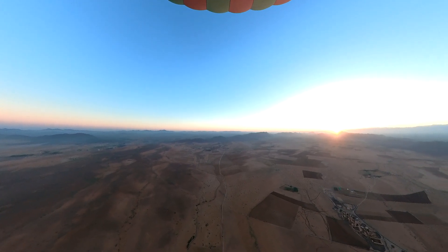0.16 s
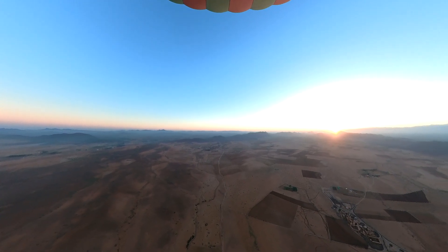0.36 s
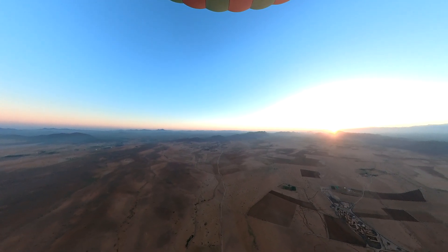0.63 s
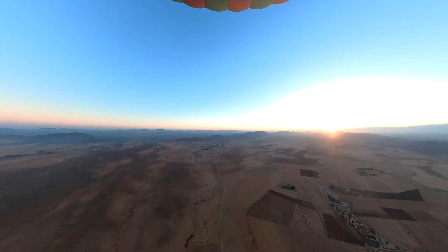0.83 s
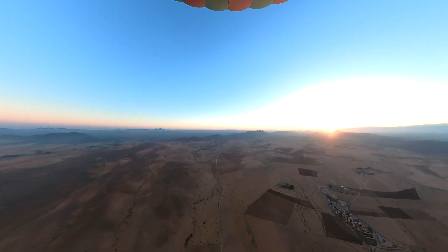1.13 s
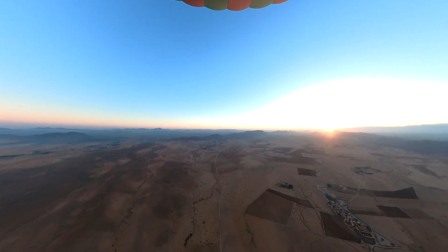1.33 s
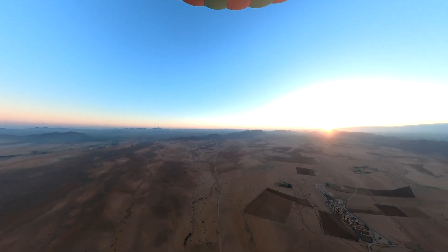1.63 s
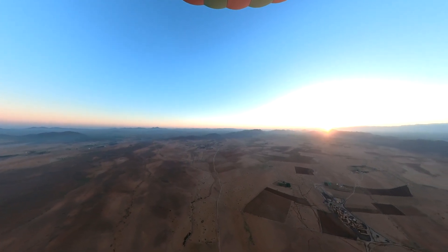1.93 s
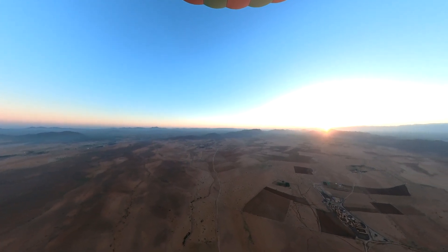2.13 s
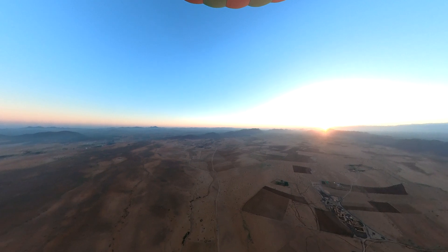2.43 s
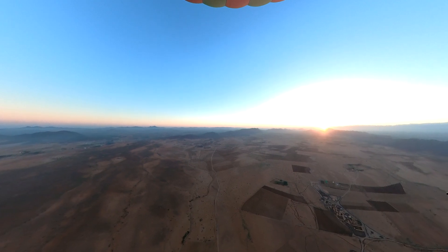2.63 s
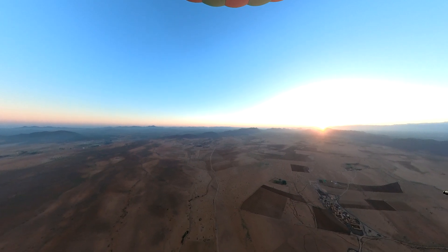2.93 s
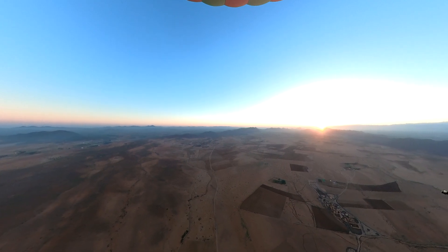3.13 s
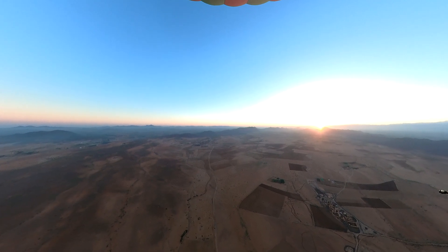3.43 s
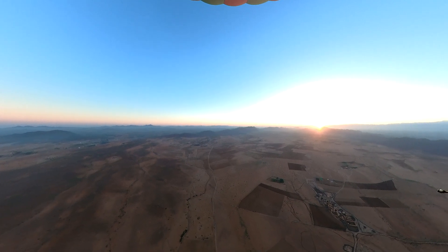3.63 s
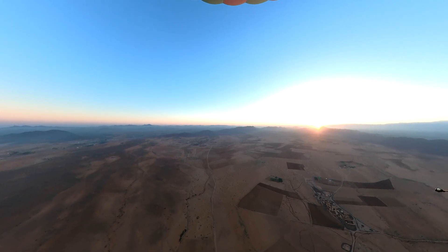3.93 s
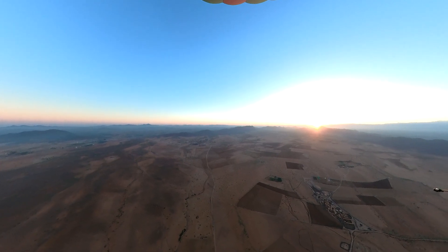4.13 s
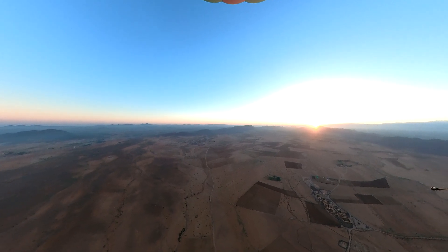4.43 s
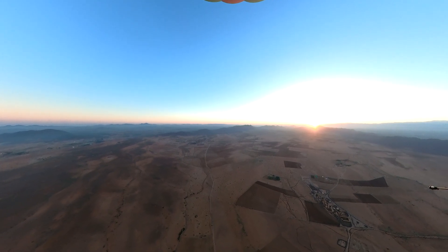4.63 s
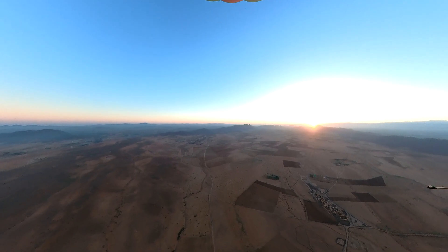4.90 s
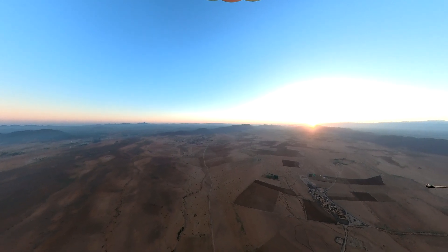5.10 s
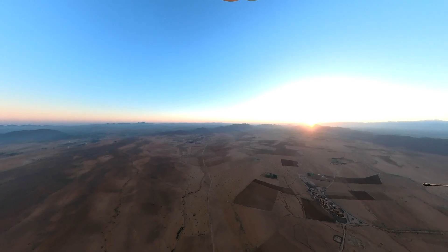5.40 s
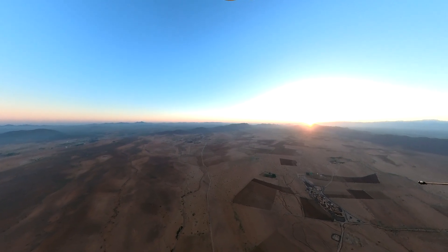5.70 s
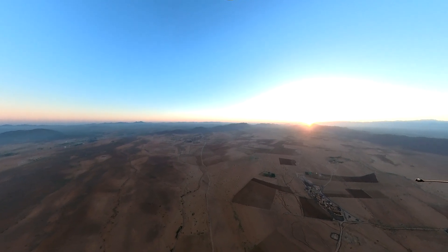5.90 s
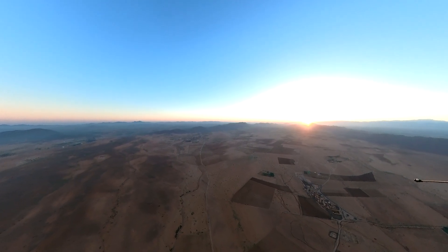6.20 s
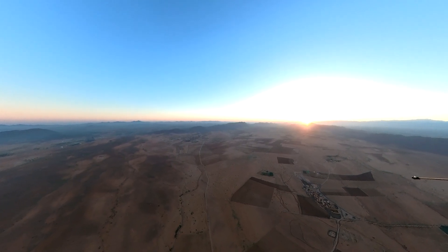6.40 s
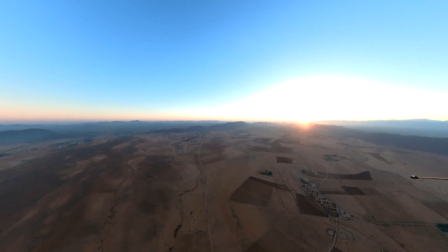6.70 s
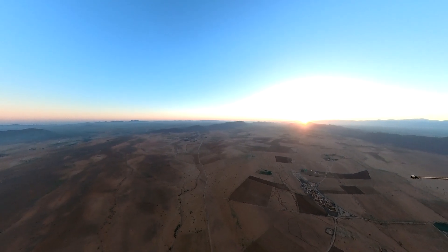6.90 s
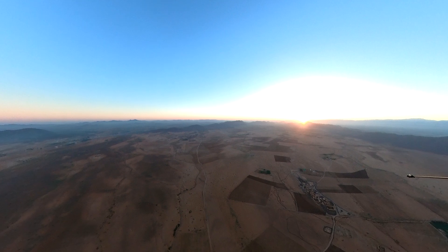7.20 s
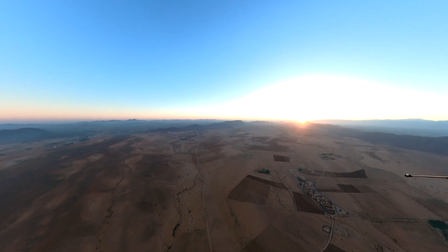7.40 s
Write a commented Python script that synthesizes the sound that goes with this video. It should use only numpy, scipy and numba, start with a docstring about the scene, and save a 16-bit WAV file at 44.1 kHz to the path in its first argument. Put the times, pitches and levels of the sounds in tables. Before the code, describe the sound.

A steady gas burner roars overhead, dominated by low rumbling flame, with fainter jet hiss and small irregular swells. A short, thin echo from the fabric envelope blends into it. Near seven seconds the blast dies within a tenth of a second, darkening into a soft thump and brief gas sputter. Only a low flame mutter and weak, breathy wavering whistle remain. Close outdoor pickup through a small microphone with automatic gain control.

```python
"""A burner blasts steadily above a balloon basket for 7 s, then its valve shuts with a soft thud and a puff.
The flame roars low and the gas jets hiss high: noise in fluttering bands, cut by the valve opening.
The fabric envelope overhead returns a short echo, a decaying noise tail.
Afterwards only the pilot flame mutters and whistles: shaped noise and an unsteady edge tone.
A small microphone with gain control holds the peaks down."""
import sys
import numpy as np
from scipy import signal
from scipy.fft import rfft, irfft
from scipy.io import wavfile
from scipy.ndimage import uniform_filter1d
from numba import njit

SR = 44100
rng = np.random.default_rng(int(sys.argv[2]) if len(sys.argv) > 2 else 0)


def transcribe(u):
    """Save the signal u as a 16-bit wav file named by the first command-line argument.

    u: samples, shape (n,) or (channels, n), limited to [-1, 1]; the rate is SR.
    q: integer samples, one column per channel.
    """
    v = np.clip(np.atleast_2d(u).T, -1, 1)
    q = np.round(v * 32767).astype(np.int16)
    wavfile.write(sys.argv[1], SR, q)


N = 332955
TIME_S = np.arange(N) / SR
HZ = np.maximum(np.arange(N // 2 + 1) * SR / N, 1)
VALVE_STARTS_S, VALVE_SHUT_S = 6.93, 7.04


def undb(db):
    """dB to gain."""
    return 10 ** (np.asarray(db) / 20)


def level(x, db):
    """Scale to an rms level over the whole signal."""
    return x * undb(db) / np.sqrt(np.mean(x ** 2))


def curve(table):
    """Table value at every moment, straight between points."""
    return np.interp(TIME_S, *np.transpose(table))


def shape(table):
    """dB at every frequency, straight between points on a log axis."""
    hz, db = np.transpose(table)
    return np.interp(np.log(HZ), np.log(hz), db, left=-120, right=-120)


def noise(gain):
    """Noise with a gain for each frequency."""
    return irfft(rfft(rng.standard_normal(N)) * gain, N)


def walk(rate_hz):
    """Random levels held 1 / rate_hz seconds and smoothed twice; zero mean, unit spread."""
    hold = int(SR / rate_hz)
    steps = np.repeat(rng.standard_normal(N // hold + 1), hold)[:N]
    smooth = uniform_filter1d(uniform_filter1d(steps, hold), hold)
    return (smooth - smooth.mean()) / smooth.std()


def turbulent(db, shared_db, own_db, rate_hz, lean_db=0, from_hz=250):
    """Half-octave noise bands flutter together and alone; lean_db sets in over two octaves above from_hz."""
    out, shared = 0, walk(rate_hz)
    for hz in 20 * 2 ** np.arange(0, 9.1, .5):
        window = np.cos(np.pi * np.clip(np.log2(HZ / hz), -.5, .5))
        reach = np.clip(np.log2(hz / from_hz) / 2, 0, 1)
        band_db = shared_db * shared + own_db * walk(rate_hz) + reach * lean_db
        out = out + undb(band_db) * noise(undb(db) * window)
    return level(out, 0)


def whistle():
    """An unsteady edge tone at the pilot nozzle: slow noise and a clear tone on a wavering pitch."""
    # swelling puffs and drifting pitch: (time [s], pitch [Hz], level [dB])
    puffs = [(7.08, 1730, -72), (7.15, 1785, -71), (7.195, 1780, -76), (7.24, 1720, -78), (7.29, 1760, -74),
             (7.33, 1750, -80), (7.39, 1800, -71), (7.43, 1790, -74), (7.45, 1770, -79), (7.5, 1780, -67),
             (7.525, 1790, -74), (7.55, 1790, -73)]
    flutter_db, waver_hz = 0.8, 16
    rise_s, blown_db = 0.11, -11.5
    width_hz, clear_ratio = 150, .8
    s, hz, db = np.transpose(puffs)
    hz = np.interp(TIME_S, s, hz) + waver_hz * walk(13.0)
    db = np.interp(TIME_S, s, db) + flutter_db * walk(15.0)
    # held down while the blast blows across the pilot, freed after the valve shuts
    db = db + blown_db * np.clip(1 - (TIME_S - VALVE_SHUT_S) / rise_s, 0, 1)
    slow = 1 / (1 + (2 * HZ / width_hz) ** 2)
    phase = 2 * np.pi * np.cumsum(hz) / SR
    breath = level(noise(slow) * np.cos(phase) + noise(slow) * np.sin(phase), 0)
    return undb(db) * level(breath + clear_ratio * np.sin(phase), 0)


def pilot():
    """The small flame that stays lit: a low mutter and a breathy whistle at its nozzle, with the microphone's
    own faint steady hiss beneath."""
    # mutter spectrum: (frequency [Hz], relative density [dB per Hz])
    mutter_shape = [(12, -54), (20, -25), (91, -1.5), (187, -1), (223, -9.5), (261, -2), (327, -14),
                    (410, -16), (456, -15.5), (783, -27), (1050, -34), (1250, -44.5), (1690, -71.5),
                    (2860, -120)]
    # hiss spectrum: (frequency [Hz], relative density [dB per Hz])
    hiss_shape = [(1240, -29.5), (2100, -3), (3610, -2), (4840, -0.5), (6720, -5), (7640, -11.5),
                  (9000, -15.5), (11700, -46), (19800, -120)]
    mutter = level(turbulent(shape(mutter_shape), 0.5, 2.0, 9.), -49)
    hiss = level(noise(undb(shape(hiss_shape))), -84)
    return mutter + whistle() + hiss


def puff():
    """Gas left in the coil sputters out just after the valve has shut and flares up with a soft thud."""
    # sputter spectrum: (frequency [Hz], relative density [dB per Hz])
    sputter_shape = [(900, -30), (1300, -2), (2400, 2), (3300, -5), (4400, -7), (5400, 1), (5900, -8),
                     (6400, -6), (7400, -30)]
    # low flare-up spectrum: (frequency [Hz], relative density [dB per Hz])
    flare_shape = [(25, -20), (50, 0), (110, -3), (200, -9), (300, -25)]
    puff_s, rise_s, fall_s = 7.095, .025, .035
    thud_s, thud_spread_s = 7.07, 0.029
    flutter_db = 2.5
    sputter = undb(-73) * turbulent(shape(sputter_shape), flutter_db, flutter_db, 60.)
    late_s = TIME_S - puff_s
    rise = np.exp(-(late_s / rise_s) ** 2 / 2)
    fall = np.exp(-np.abs(late_s) / fall_s)
    swell = np.where(late_s < 0, rise, fall)
    flare = level(noise(undb(shape(flare_shape))), -42.5)
    thud = flare * np.exp(-((TIME_S - thud_s) / thud_spread_s) ** 2 / 2)
    return sputter * swell + thud


def envelope_echo(x):
    """The fabric dome sends the sound back late, smeared and thin: it passes bass and swallows the top."""
    delay_s, t60_s, echo_db, band_hz = .125, .12, -23.5, (950, 4900)  # some 43 m to the crown and back
    t = np.arange(SR // 2) / SR
    tail = rng.standard_normal(len(t)) * undb(-60 * t / t60_s) * (t > delay_s)
    tail = tail * undb(echo_db) / np.sqrt(np.sum(tail ** 2))
    late = signal.fftconvolve(x, tail)[:N]
    return signal.sosfilt(signal.butter(3, band_hz, "band", fs=SR, output="sos"), late)


def valve():
    """Change of roar and jets in dB: jets follow the evenly closing valve, the flame burns out after them."""
    jet_power, flame_power, burnout_s = 0.82, 1.5, 0.026
    opening = np.clip((VALVE_SHUT_S - TIME_S) / (VALVE_SHUT_S - VALVE_STARTS_S), 0, 1)
    keep = np.exp(-1 / (burnout_s * SR))
    flame = signal.lfilter([1 - keep], [1, -keep], opening ** flame_power, zi=[keep])[0]
    return 20 * np.log10(np.maximum([flame, opening ** jet_power], 1e-3))


def roar(ripple_db, cut_db):
    """Combustion roar: turbulent low noise whose upper body and deep rumble vary on their own."""
    # roar spectrum: (frequency [Hz], relative density [dB per Hz])
    roar_shape = [(12, -49), (20, -17), (59, -1.5), (131, -3.5), (193, -0.5), (406, -8), (471, -12),
                  (547, -12), (635, -17), (779, -17), (1700, -41.5), (2210, -66), (3740, -120)]
    # lean of the upper body: (time [s], relative level [dB])
    body = [(0, -0.5), (.7, 1.5), (1.2, 1.5), (1.7, -0.5), (2.3, -1), (2.8, 0.5), (3.1, 3.5), (3.4, -0.5),
            (3.65, 1.5), (4.1, -2), (4.45, 1), (4.9, -0.5), (5.5, -2), (6.1, 0.5), (6.9, 0.5)]
    # deep rumble, used against its mean: (time [s], level [dB])
    rumble = [(0, -32), (1.3, -31.5), (2.2, -32), (3.2, -29.5), (4.3, -31.5), (5.2, -32.5), (6.1, -33.5),
              (6.5, -32.5), (6.95, -36)]
    rumble_top_hz = 130
    lean_db = curve(body) + 0.68 * cut_db  # the upper body dies faster
    flame = turbulent(shape(roar_shape) + ripple_db, 0.78, 0.48, 9., lean_db, 220)
    deep = irfft(rfft(flame) / (1 + (HZ / rumble_top_hz) ** 4), N)
    rumble_db = curve(rumble)
    flame = flame + (undb(rumble_db - rumble_db.mean()) - 1) * deep
    return undb(-21.5 + cut_db) * flame


def jets(ripple_db, cut_db):
    """Nozzle hiss: falling pressure slows the gas, so it darkens as it dies."""
    # jet spectrum: (frequency [Hz], relative density [dB per Hz])
    jet_shape = [(760, -34.5), (1300, -4), (1640, -7.5), (2220, -3), (2970, -11), (6010, -5), (7600, -12),
                 (8240, -19), (9010, -33), (11700, -62), (19800, -120)]
    # gas flow while the valve is open: (time [s], jet level [dB])
    flow = [(0.0, -46), (0.67, -43.5), (1.81, -45.5), (2.75, -45), (3.05, -43), (3.48, -44.5), (3.6, -42),
            (3.82, -45.5), (4.7, -44), (5.5, -45.5), (6.2, -44), (6.44, -44.5), (6.5, -47.5), (6.76, -45),
            (6.9, -48)]
    hiss = turbulent(shape(jet_shape) + ripple_db, 0.25, 0.45, 14., 0.99 * cut_db, 2200)
    return undb(curve(flow) + cut_db) * hiss


def burner():
    """Roar and jets, both cut by the valve and rippled by nearby reflections."""
    # reflections off basket and burner frame: (frequency [Hz], width [Hz], ripple [dB])
    ripples = [(194, 50, 2), (376.6, 30, -2.5), (418, 50, 2.5), (465, 46, -3), (556, 73, 2.5),
               (650, 55, -1.5), (880, 78, -2), (975, 58, 3), (1310, 70, 2), (1390, 90, -1),
               (1790, 120, 1.1), (2580, 110, 1.5), (3480, 300, -0.9), (4200, 170, 1.4), (5300, 600, -1),
               (6740, 250, 1.1)]
    roar_cut_db, jet_cut_db = valve()
    ripple_db = sum(db / (1 + (2 * (HZ - hz) / width_hz) ** 2) for hz, width_hz, db in ripples)
    return roar(ripple_db, roar_cut_db) + jets(ripple_db, jet_cut_db)


def scene():
    """Burner, its echo, the last puff and the pilot."""
    blast = burner()
    return (blast + envelope_echo(blast) + puff() + pilot())[None]


@njit
def follow(x, attack, release):
    """Level follower, quick up and slow down."""
    e, y = np.abs(x[:2000]).mean(), np.empty(len(x))
    for i in range(len(x)):
        e += (abs(x[i]) - e) * (attack if abs(x[i]) > e else release)
        y[i] = e
    return y


def record(dry):
    """Gain control leans on loud swells, peaks round off; the deepest bass and the top are cut."""
    bass_cut_hz, top_hz = 42, 9170
    limit_db, limit_ratio, attack_s, release_s = -24.5, 1.914, 0.0022, 0.054
    makeup_db, round_db = 1.42, -8  # peaks round off towards round_db
    dry = signal.sosfilt(signal.butter(2, bass_cut_hz, "high", fs=SR, output="sos"), dry)
    loudness = follow(dry[0], 1 / (attack_s * SR), 1 / (release_s * SR))
    gain = (undb(limit_db) / np.maximum(loudness, undb(limit_db))) ** (1 - 1 / limit_ratio)
    rounded = undb(round_db) * np.tanh(undb(makeup_db - round_db) * dry * gain)
    return signal.sosfilt(signal.ellip(8, .2, 70, top_hz, fs=SR, output="sos"), rounded)


dry = scene()
out = record(dry)
transcribe(out)
```